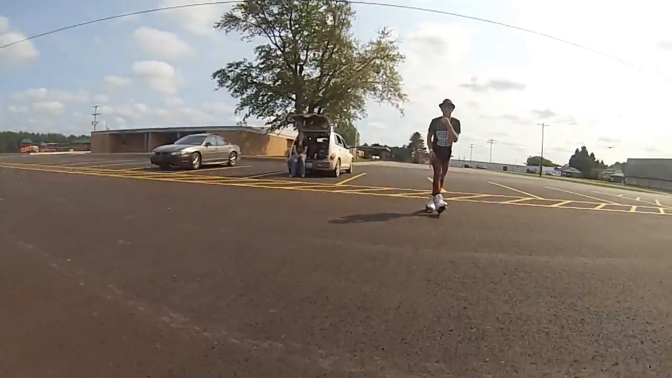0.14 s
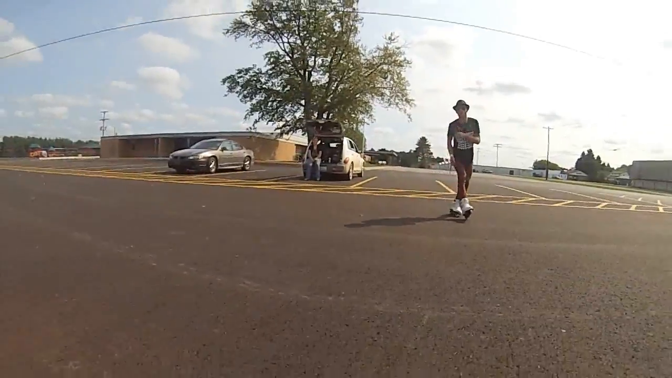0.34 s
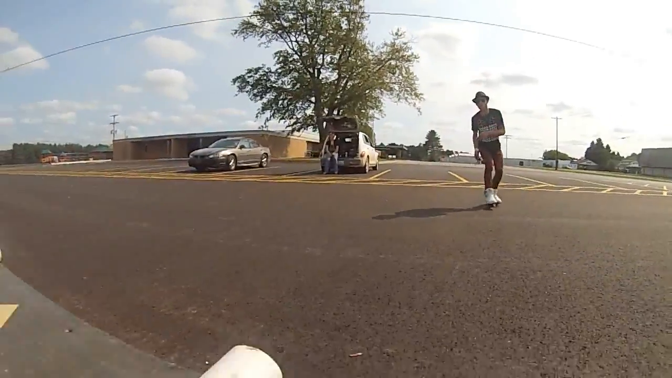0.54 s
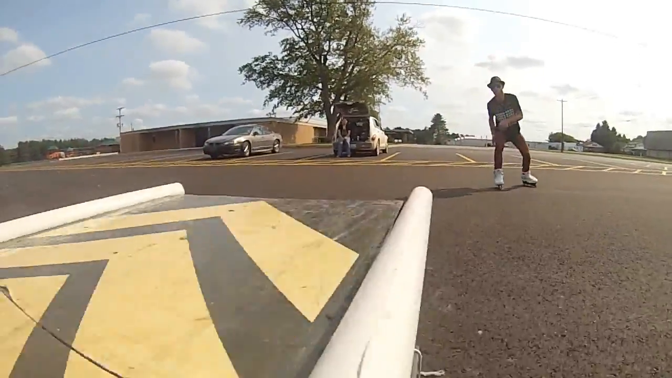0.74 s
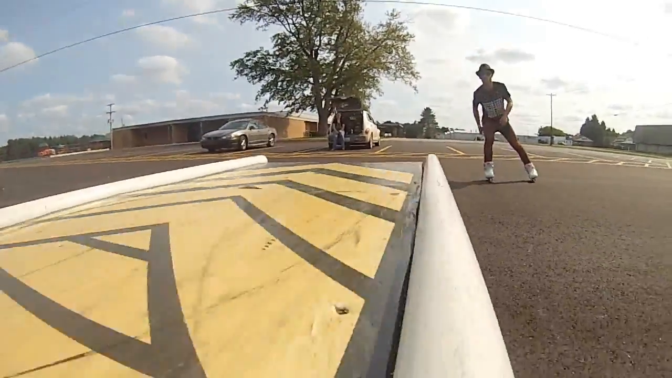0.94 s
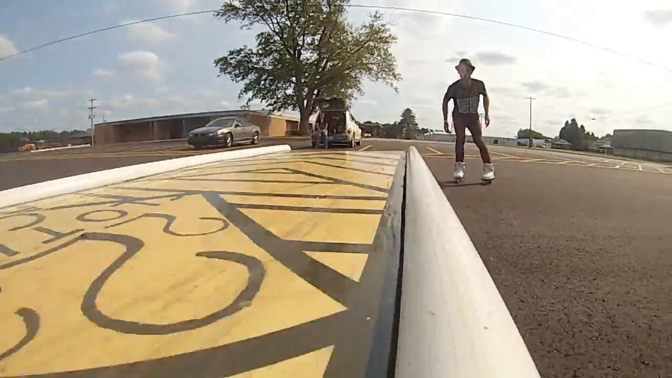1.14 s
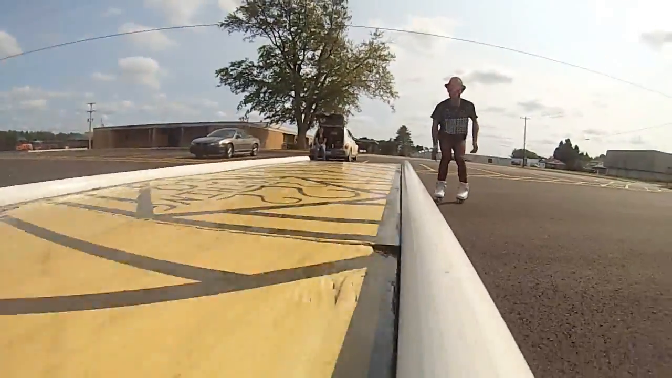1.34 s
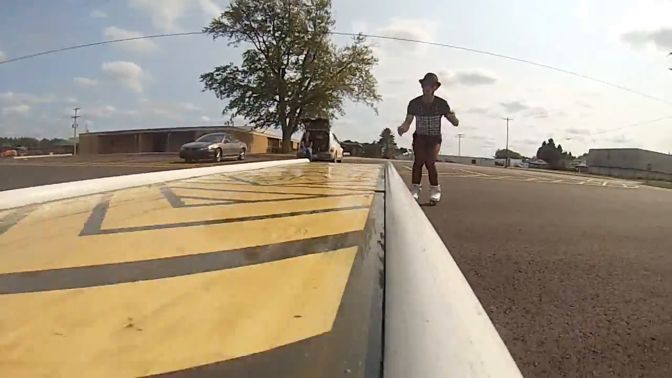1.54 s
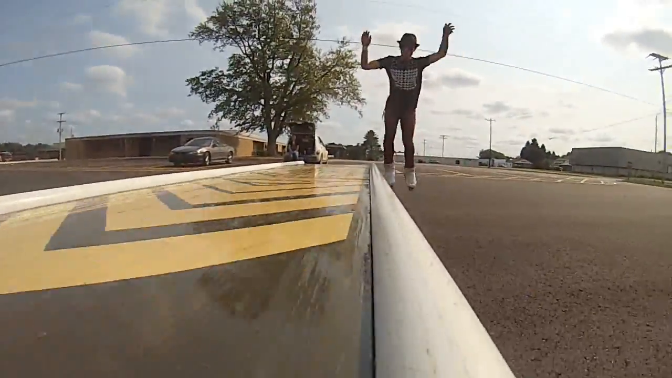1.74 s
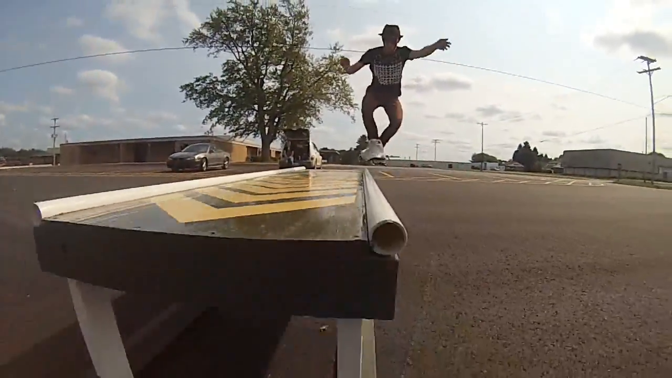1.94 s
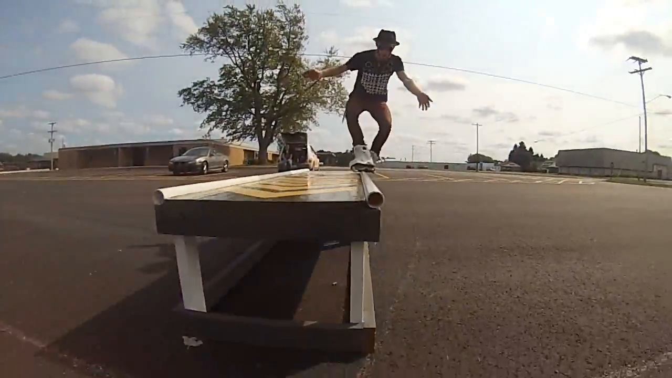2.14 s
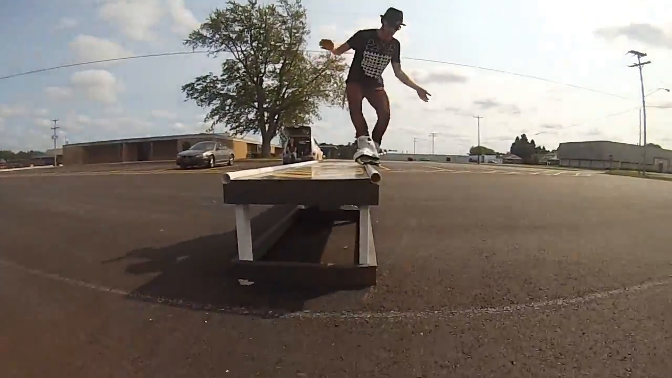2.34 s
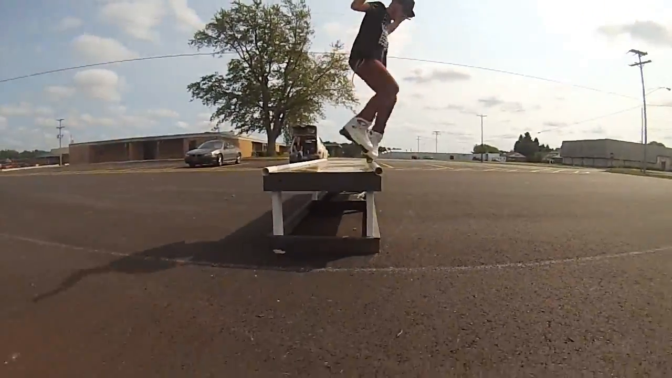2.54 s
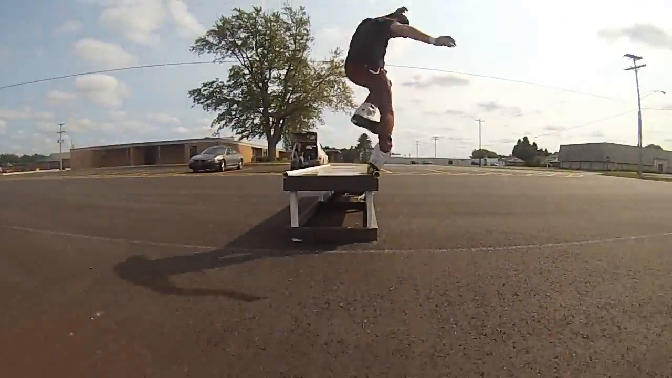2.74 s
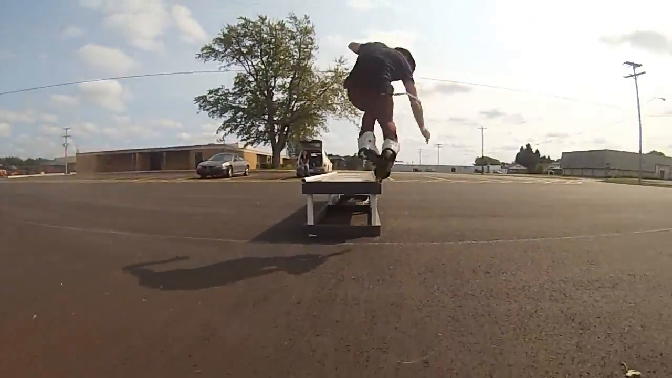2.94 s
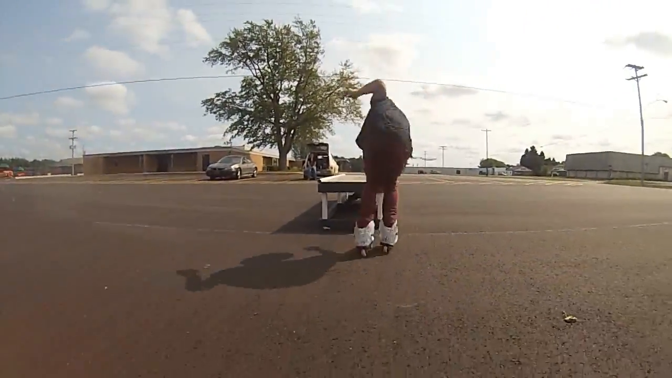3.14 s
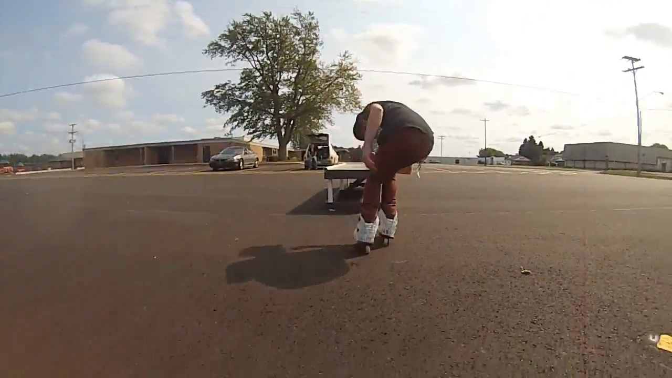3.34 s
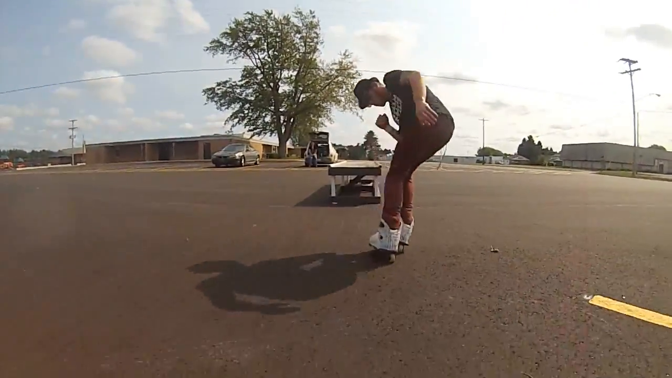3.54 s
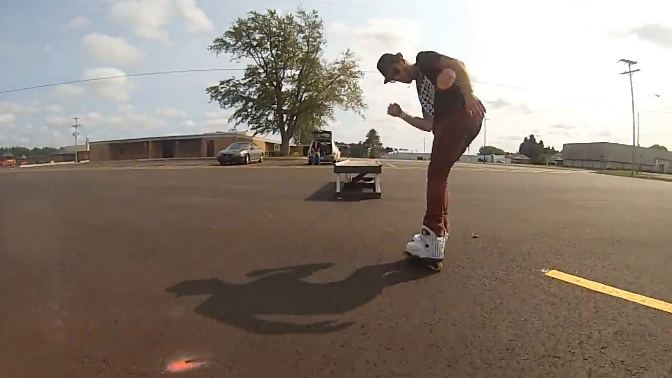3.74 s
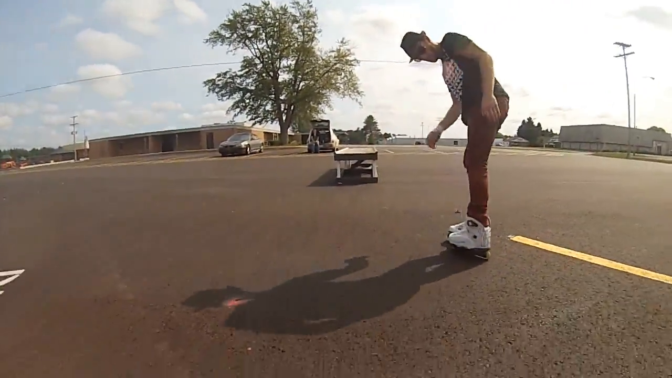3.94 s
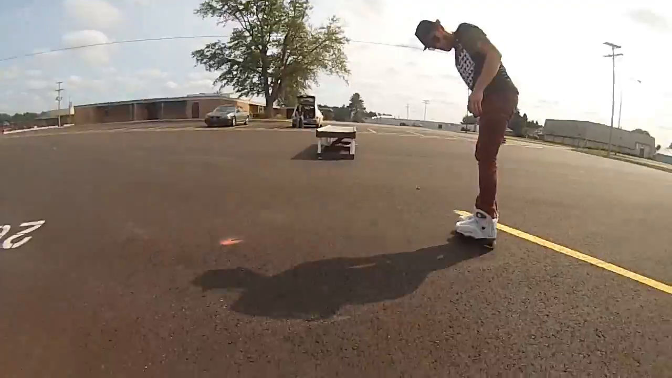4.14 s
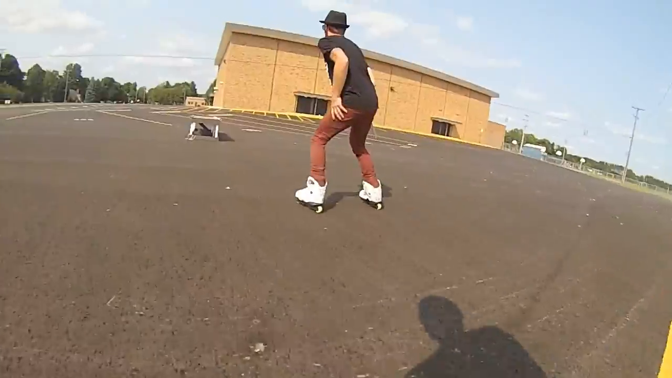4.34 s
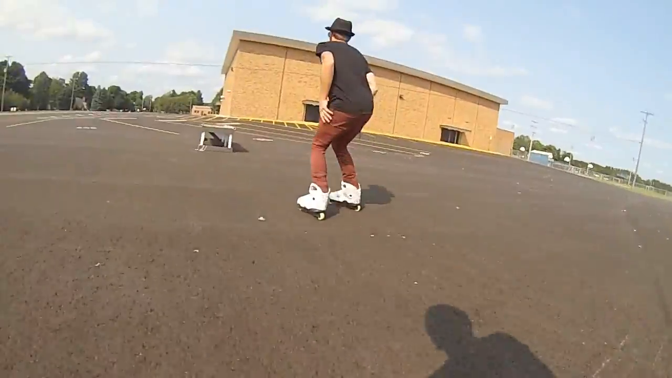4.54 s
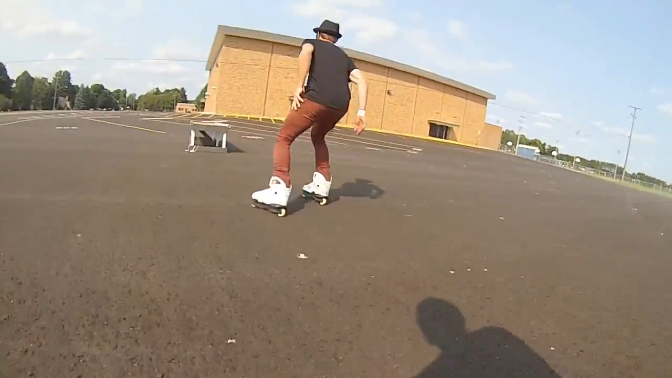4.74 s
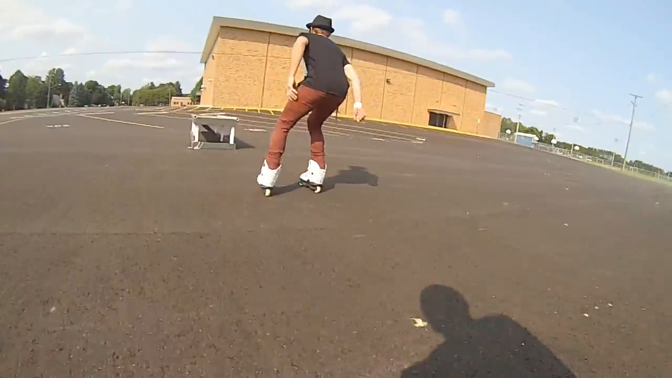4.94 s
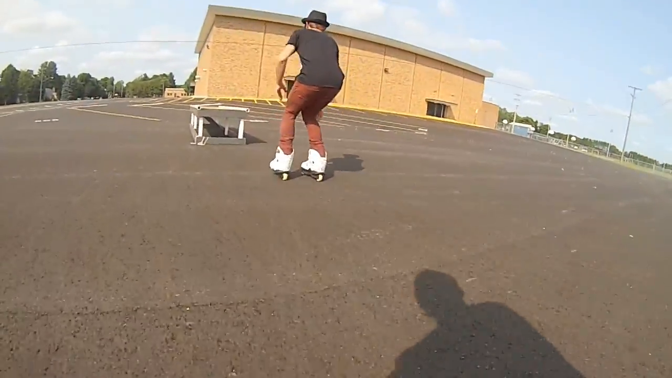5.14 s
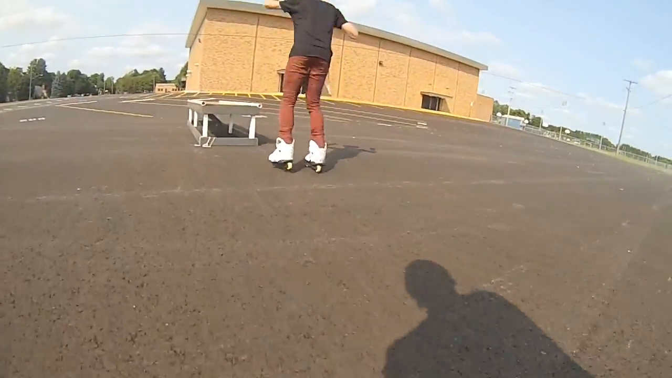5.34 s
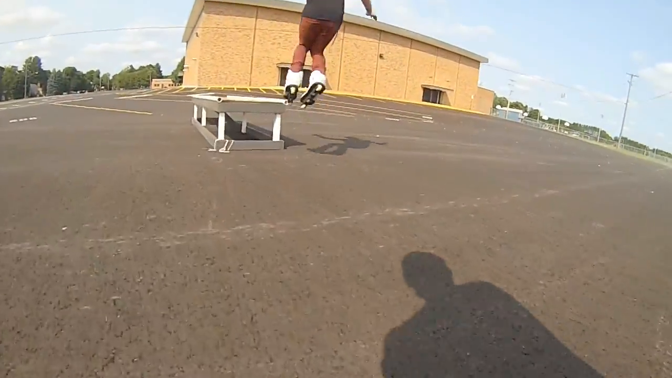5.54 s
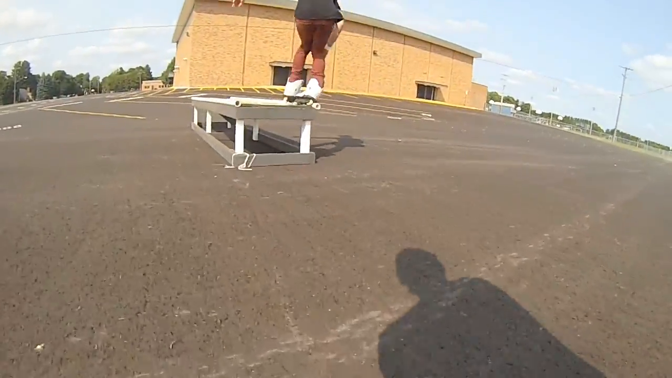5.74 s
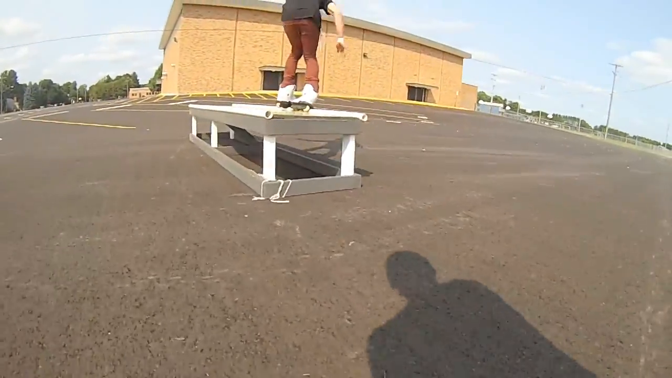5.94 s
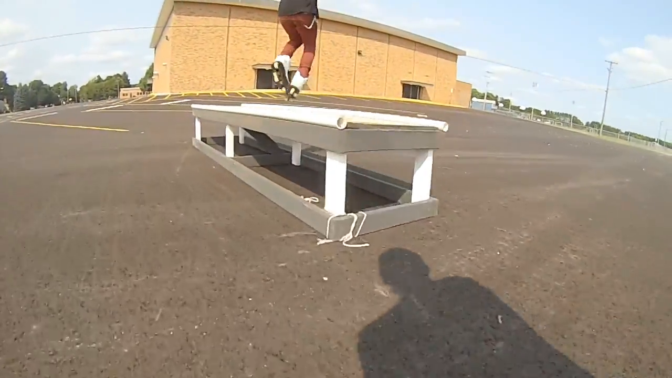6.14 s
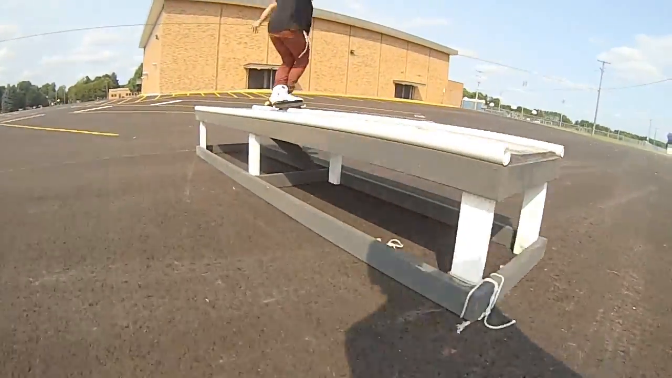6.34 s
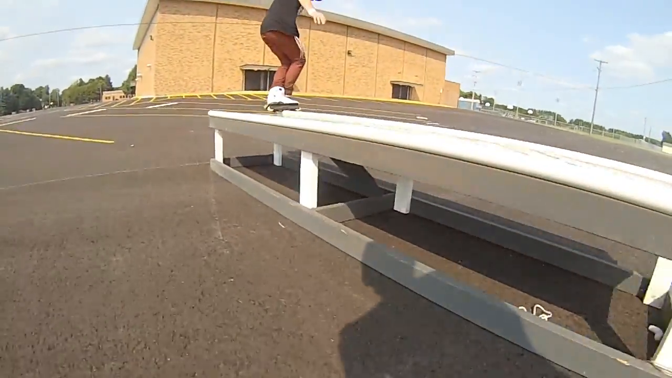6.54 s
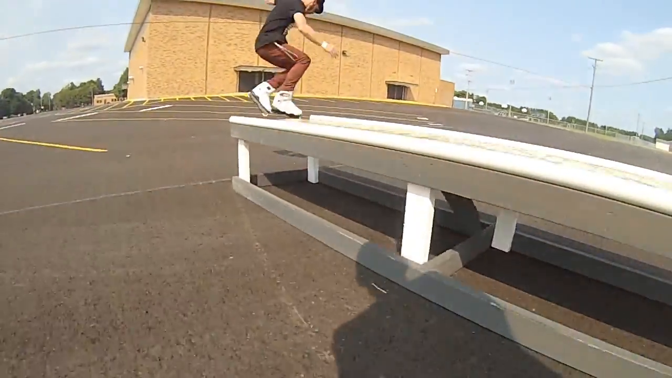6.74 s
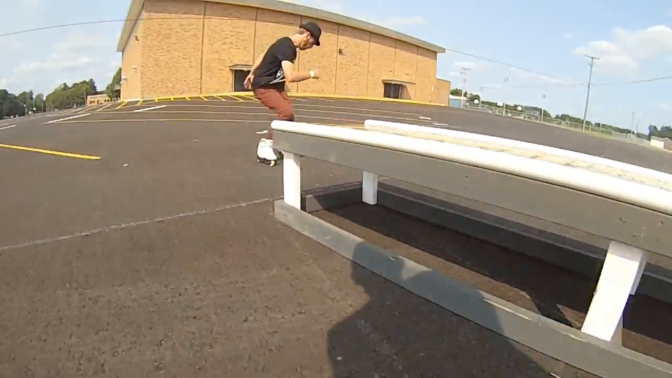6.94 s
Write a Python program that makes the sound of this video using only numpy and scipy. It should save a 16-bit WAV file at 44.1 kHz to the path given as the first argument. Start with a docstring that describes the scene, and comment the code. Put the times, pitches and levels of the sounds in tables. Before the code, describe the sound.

In an open parking lot, a microphone moving with an inline skater picks up a soft, low wheel rumble with dry rasp, faint hiss and small regular ticks, plus light wind. At about 2.05 s a tight cluster of hard plastic cracks and deep hollow wood knocks lands on a box, which rings briefly. Quieter sliding follows, then two sharper knocks near 2.75 s and a quick clatter of wheels slapping asphalt at 3.15 s. Rolling continues quietly until a small slap at 4.35 s and a rougher, brighter sideways scrub to 4.7 s. The wheels then roll louder, bumping over grit. Box knocks come at 5.75 s amid a low wind gust, bright ticks around 6.0 to 6.2 s, heavier clacks at 6.3 to 6.4 s and a softer one at 6.57 s. A dry double slap on asphalt ends it near 6.97 s. Hardly any reverberation.

```python
"""Inline skates on the asphalt of an open parking lot, heard from a point that rolls along with the skater.
Random stone kicks and noise, filtered in three bands, make the wheels rumble, rasp and hiss.
Twice the skater jumps on a wooden box, slides along it and drops off: noise cracks, damped knocks, ringing modes.
Between the passes the wheels scrub sideways; short rings with a bright snap tick in step or singly.
Wind buffets as low noise, and a limiter ducks the whole sound after each hard blow."""
import sys
import numpy as np
from scipy import signal
from scipy.fft import rfft, irfft
from scipy.io import wavfile
from scipy.ndimage import uniform_filter1d

SR = 44100
rng = np.random.default_rng(int(sys.argv[2]) if len(sys.argv) > 2 else 0)


def bounce(signal):
    """Save signal as a 16-bit WAV file at the path given by the first command-line argument."""
    frames = np.transpose(np.atleast_2d(signal))
    limited = np.clip(frames, -1, 1)
    pcm = np.round(limited * 32767).astype(np.int16)
    wavfile.write(sys.argv[1], SR, pcm)


N = 308700  # samples, 7 s


def gain_of(db):
    """Decibel law: 20 dB is a factor of ten in amplitude."""
    return 10 ** (np.asarray(db) / 20)


def evened(x):
    """Power normalization: scales to an rms of 1."""
    return x / np.sqrt(np.mean(x ** 2) + 1e-20)


def add(mix, s, sound):
    """Superposition: adds a sound to the mix from time s in seconds."""
    part = mix[round(s * SR):][:len(sound)]
    part += sound[:len(part)]


def colour(x, points, size=4096):
    """Minimum-phase filtering: a causal response of the given spectrum; white noise keeps its power."""
    point_hz, point_db = np.transpose(points)
    hz = abs(np.fft.fftfreq(size, 1 / SR)) + 1
    log_gain = np.log(gain_of(np.interp(np.log(hz), np.log(point_hz), point_db)))
    # the Hilbert transform of the log gain gives the phase
    spectrum = np.exp(np.conj(signal.hilbert(log_gain)))
    taps = np.fft.ifft(spectrum).real[:size // 2]
    return signal.oaconvolve(x, taps / np.linalg.norm(taps))[:len(x)]


def band(x, low_hz, high_hz):
    """Band-pass filtering: keeps one band, with steep skirts."""
    hz = np.fft.rfftfreq(len(x), 1 / SR) + 1
    skirts = np.sqrt((1 + (low_hz / hz) ** 20) * (1 + (hz / high_hz) ** 20))
    return irfft(rfft(x) / skirts, len(x))


def wander(rate_hz):
    """Low-pass random modulation: slow fluctuation of rms 1."""
    hz = np.fft.rfftfreq(N, 1 / SR)
    return evened(irfft(rfft(rng.standard_normal(N)) / (1 + (hz / rate_hz) ** 4), N))


def ring(modes, t):
    """Modal superposition: a struck body sounds as a sum of exponentially dying sines."""
    return sum(gain_of(db - 60 * t / t60) * np.sin(2 * np.pi * hz * t) for hz, db, t60 in modes)


def nearest(modes, pitch_hz, focus_hz, detune):
    """Modal excitation: where a body is struck decides which modes ring most; each blow detunes them."""
    chosen = []
    for hz, db, t60 in modes:
        loss_db = 10 * np.log10(1 + ((hz - pitch_hz) / focus_hz) ** 2)
        chosen.append((hz * (1 + detune * rng.uniform(-0.97, 1)), db - loss_db, t60))
    return chosen


def push(t, hz, swell_s):
    """Damped oscillation: a swing whose envelope swells to 1 at swell_s and then dies."""
    return t / swell_s * np.exp(1 - t / swell_s) * np.sin(2 * np.pi * hz * t)


def stones(per_s, spread_db):
    """Random impact train: wheels meet stones as many small kicks and a few large ones."""
    size = gain_of(spread_db * np.minimum(rng.exponential(1, N), 4))
    struck = rng.random(N) < per_s / SR
    return evened(size * rng.choice([-1, 1], N) * struck)


def scatter(x, spread_s):
    """Multipath dispersion: short paths through wheel, frame and boot smear each kick over milliseconds."""
    t = np.arange(1024) / SR
    paths = rfft(rng.standard_normal(len(t)) * (t / spread_s) * np.exp(-t / spread_s))
    flat_paths = irfft(paths / (abs(paths) + 1e-12))[:700]  # keeps the phases, levels the spectrum
    return signal.oaconvolve(x, flat_paths)[:len(x)]


# How hard the wheels roll; rumble, rasp and hiss all follow it.
# Each row: time in seconds, level in dB.
ROLLING_LEVEL = [(0.08, -32), (0.33, -35), (0.87, -32), (1.35, -32), (1.58, -35), (1.71, -31.5),
                 (1.87, -36), (2.66, -30), (3.45, -34), (3.7, -33), (4.28, -34.5), (4.39, -28.5),
                 (5.03, -26), (5.22, -27), (5.87, -25), (6.24, -26), (6.78, -29), (6.9, -27)]


def roll_db(s):
    """Linear interpolation: level of the rolling in dB at a time in seconds."""
    return np.interp(s, *np.transpose(ROLLING_LEVEL))


# Rolling spectra of the first pass, the sideways scrub and the second pass.
# Each row: frequency in Hz, relative spectral level in dB per Hz.
FIRST_PASS_SPECTRUM = [(45, -14), (130, 1), (200, -2.5), (320, -6.5), (460, -3), (690, -5.5), (1050, -19.5),
                       (1550, -18.5), (2100, -18.5), (3200, -24.5), (3800, -32.5), (4900, -32.5),
                       (7500, -41), (14000, -47)]
SCRUB_SPECTRUM = [(50, -30), (150, 3), (370, -3.5), (520, -2.5), (720, 3), (1000, -19.5), (1850, -25.5),
                  (2450, -25), (3400, -26), (4300, -30), (5600, -29.5), (7000, -34), (9300, -36.5),
                  (11000, -45), (14000, -42)]
SECOND_PASS_SPECTRUM = [(50, -16), (170, 2.5), (290, -2.5), (380, -6), (670, -4), (1000, -18), (1300, -14),
                        (1560, -9.5), (1780, -20), (2100, -13), (3400, -21), (4000, -40.5), (9500, -52),
                        (10800, -59), (14000, -58)]


def rolling(spectrum, start, end, rasp_db, hiss_db, grainy, gritty, patchy_db, chatter_db=-1.0):
    """Roughness excitation: stone kicks and smooth tread noise shake wheel and boot, more on rough patches."""
    t = np.arange(N) / SR
    kicks = stones(per_s=1100, spread_db=2)
    tread = rng.standard_normal(N)
    grit = gritty * scatter(stones(per_s=200, spread_db=0.0), spread_s=0.0018)  # reaches only rasp and hiss
    ground_db = patchy_db * wander(rate_hz=22)
    wheel_db = gritty * chatter_db * np.clip(wander(rate_hz=96), -2, 1.6)  # wheels chatter in their frames
    rumble = evened(band(colour(grainy * kicks + tread, spectrum), 30, 1050))
    rasp = evened(band(colour((grit + tread) * gain_of(wheel_db), spectrum), 1050, 3900))
    hiss = evened(band(colour(.5 * grit + tread, spectrum), 3900, 16000))
    wheels = gain_of(ground_db) * rumble
    wheels += gain_of(rasp_db + .5 * ground_db) * rasp
    wheels += gain_of(hiss_db) * hiss
    stretch = uniform_filter1d(1. * (t >= start) * (t < end), size=600)
    return gain_of(roll_db(t)) * wheels * np.sqrt(abs(stretch))  # equal-power crossfade at the ends


# Swells of hiss in one band, some from sliding.
# Each row: centre in seconds, half length in seconds, level in dB, centre frequency in Hz, width in Hz.
HISS_SWELLS = [(0.05, 0.91, -60, 3300, 400), (0.85, 0.14, -53.5, 4500, 1400), (1.55, 0.3, -68, 13600, 1840),
               (1.6, 0.35, -58.5, 5670, 3440), (2.303, 0.43, -63.5, 8500, 3000),
               (3.545, 0.88, -60, 4800, 2600), (4.038, 0.069, -52, 2790, 692), (4.61, 0.1, -48, 5350, 900),
               (4.58, 0.014, -51, 8900, 3500), (4.88, 0.72, -54, 3230, 400), (6.9, 0.15, -62, 4600, 1300)]


def hiss_swells():
    """Band-limited noise: swells of hiss in one band, some from sliding, under a bell-shaped envelope."""
    out, t = np.zeros(N), np.arange(N) / SR
    hz = np.fft.rfftfreq(N, 1 / SR)
    for s, half_s, db, centre_hz, width_hz in HISS_SWELLS:
        response = 1 / (1 + ((hz - centre_hz) / width_hz) ** 2) ** 3.3
        hiss = irfft(rfft(rng.standard_normal(N)) * response, N)
        out += gain_of(db) * np.exp(-.5 * ((t - s) / half_s) ** 2) * evened(hiss)
    return out


# Spectrum of the boot's crack. Each row: frequency in Hz, relative spectral level in dB per Hz.
CRACK_SPECTRUM = [(200, -6.5), (600, 10), (1100, 3.5), (1750, -2.5), (2300, 0), (2650, -7), (3250, -2),
                  (4000, -9.5), (5600, -14), (7000, -17.5), (9500, -25), (14000, -28.5)]
# Modes of the skate frame. Each row: frequency in Hz, relative level in dB, 60 dB decay time in seconds.
FRAME_MODES = [(1194, 9.5, 0.0088), (2180, 0, 0.018), (2680, -1.5, 0.031), (2950, 5.5, 0.019),
               (3607, 3, 0.017), (4940, 3, 0.022), (5580, -6, 0.013)]


def crack(t, decay_ms, dull_hz, ring_hz, rattle_db=-21, rattle_s=0.022, rise_s=0.0013):
    """Impact: hard plastic cracks, the frame rings, then wheels and buckles rattle briefly."""
    fade = np.exp(-1000 * t / decay_ms)
    rattle = gain_of(rattle_db) * np.exp(-t / rattle_s)
    burst = colour((fade + rattle) * rng.standard_normal(len(t)), CRACK_SPECTRUM)
    # softer contacts lose treble
    burst = signal.lfilter(*signal.butter(1, min(dull_hz, .45 * SR), fs=SR), burst)
    frame = ring(nearest(FRAME_MODES, ring_hz, focus_hz=220, detune=0.057), t)
    return (1.63 * burst + frame) * (1 - np.exp(-t / rise_s))


def thump(t, thump_hz=158, thump_s=0.0047, shell_hz=262, shell_db=-2.5, shell_s=0.0039):
    """Momentum transfer: body weight and boot shell give two low damped swings."""
    return push(t, thump_hz, thump_s) + gain_of(shell_db) * push(t, shell_hz, shell_s)


DECK_SWELL_S, SOLE_HZ = 0.0026, 460  # swell time of a knock on the deck; pitch of the settling sole
REBOUND_S, REBOUND_DB = 0.0089, -13  # basic spacing of the sole's rebounds; step in level from each to the next
# Modes of the box's plywood deck and frame.
# Each row: frequency in Hz, relative level in dB, 60 dB decay time in seconds.
BOX_MODES = [(110, -7, 0.48), (148, -27, 0.09), (192.6, 3, 0.3), (221.6, 5.5, 0.29), (259, -16, 0.17),
             (302, 4.5, 0.18), (400, 1, 0.1), (439, 15, 0.13), (466, 6.5, 0.13), (542, 8.5, 0.2),
             (570.6, 19.5, 0.072), (609, 13, 0.14), (666, -10, 0.17), (795, -1, 0.21), (865, 5.5, 0.13),
             (930, 2, 0.11), (1083, -9, 0.17), (1204, -27, 0.081)]
# A skate meets the box: its shell cracks, its edge knocks on the deck, then the sole settles.
# Each row: start in seconds, crack level in dB, crack decay in ms, dull-above frequency in Hz, frame ring
# in Hz, knock lag in ms, knock level in dB, knock pitch in Hz, settling lag in ms, settling level in dB,
# thump level in dB, relative box ring level in dB.
BOX_CONTACTS = [(2.0512, -24, 6, 2000, 1200, 0.17, -6.5, 610, 2.3, -18, -22, -27),
                (2.055, -18.5, 19, 4500, 2200, 1.2, 0.5, 782, 7, 3.5, -5, -25),
                (2.072, -10.5, 9.4, 4000, 1250, 0.49, 1, 840, 8, 1, -4.5, -15.5),
                (2.079, -7, 5.5, 8000, 1700, 1.34, 3, 700, 8.5, 11, -2.5, -5.5),
                (2.7465, -13, 2.05, 18000, 5700, 7, -1.5, 508, 10.7, -12, -27, -2.5),
                (2.7738, -16, 7.6, 18000, 3400, 9, 5.5, 544, 30.4, 3.5, -21, -7),
                (5.729, -19, 5.2, 11000, 5700, 7.9, -12.5, 481, 14.3, -28, -17.5, -19.5),
                (5.760, -11, 4.2, 7000, 2640, 5.5, -3.5, 650, 14.1, -11, -39, -15),
                (6.3006, -17.5, 12, 2200, 1310, 0.25, 4.5, 670, 9.7, -13, -2.5, -5.5),
                (6.316, -22.5, 19, 2500, 1460, 0.41, -6, 705, 6.6, -4, -5.5, -8.5),
                (6.354, -8.5, 7.6, 4200, 2700, 0.26, -1.5, 710, 9.52, -1, 0, -10),
                (6.388, -28, 20, 4000, 1300, 1.07, -10, 533, 12, -12, -8, -11.5),
                (6.5655, -14.5, 7, 1260, 1390, 0.42, -5, 543, 21.4, -12.5, -32, -24)]


def box_hits(box_db=-11, settle_thump_db=-2, count=3):
    """Plate resonance: after crack, knock and thump the sole settles and chatters while the box rings on."""
    out, t = np.zeros(N), np.arange(16384) / SR
    box = gain_of(box_db) * ring(BOX_MODES, t) * (1 - np.exp(-t / 0.002))
    for (s, crack_db, decay_ms, dull_hz, ring_hz, knock_ms, knock_db, knock_hz,
         settle_ms, settle_db, thump_db, ring_db) in BOX_CONTACTS:
        knock_at, settle_at = s + knock_ms / 1000, s + settle_ms / 1000
        add(out, s, gain_of(crack_db) * crack(t, decay_ms, dull_hz, ring_hz))
        knock = gain_of(knock_db) * push(t, knock_hz, DECK_SWELL_S)
        add(out, knock_at, knock + gain_of(thump_db) * thump(t) + gain_of(ring_db) * box)
        settle = gain_of(settle_db) * push(t, SOLE_HZ, DECK_SWELL_S)
        add(out, settle_at, settle + gain_of(thump_db + settle_thump_db) * thump(t))
        for k in range(1, count + 1):
            rebound = push(t, SOLE_HZ * rng.uniform(1, 1.4), DECK_SWELL_S)
            rebound_at = settle_at + REBOUND_S * (k + rng.uniform(-0.04, 0.16))
            add(out, rebound_at, gain_of(settle_db + k * REBOUND_DB) * rebound)
    return out


# Wheels slapping down on asphalt.
# Each row: start in seconds, crack level in dB, crack decay in ms, dull-above frequency in Hz,
# frame ring in Hz, knock level in dB, knock pitch in Hz, thump level in dB.
ASPHALT_SLAPS = [(3.1549, -6.5, 1.3, 12500, 3600, 2.5, 567, -6.5),
                 (3.1649, -10.5, 5.6, 13000, 3480, -1.5, 770, -11),
                 (3.174, -19, 3.8, 9000, 2180, 2.5, 454, -11),
                 (3.180, -8.5, 3.2, 10770, 5560, 0.5, 600, -13.5),
                 (4.350, -15, 3.1, 3400, 1140, -6, 577, -21), (6.9624, -28, 4, 9000, 1250, -7.5, 254, -33),
                 (6.9673, -11, 2.8, 17000, 2930, -2.5, 608, -12),
                 (6.9742, -9.5, 3.2, 12000, 3170, -3.5, 830, -30)]
# Wheels knocking over bumps in the asphalt. Each row: start in seconds, level in dB.
ASPHALT_BUMPS = [(0.487, -23.5), (0.885, -22), (4.648, -17.5), (4.887, -19), (5.021, -18), (5.464, -20),
                 (6.715, -15.5), (6.882, -16)]


def asphalt_hits(slap_swell_s=0.00088, bump_hz=640, bump_swell_s=0.0011, bump_thump_db=-9):
    """Impact on a stiff ground: slaps crack, knock and thump at once; bumps knock with a weaker thump."""
    out, t = np.zeros(N), np.arange(8192) / SR
    for s, crack_db, decay_ms, dull_hz, ring_hz, knock_db, knock_hz, thump_db in ASPHALT_SLAPS:
        knock = gain_of(knock_db) * push(t, knock_hz, slap_swell_s)  # short and dry
        blow = gain_of(crack_db) * crack(t, decay_ms, dull_hz, ring_hz)
        add(out, s, blow + knock + gain_of(thump_db) * thump(t))
    for s, db in ASPHALT_BUMPS:
        bump = push(t, bump_hz, bump_swell_s) + gain_of(bump_thump_db) * thump(t)
        add(out, s, gain_of(db) * bump)
    return out


# Modes of wheel and frame. Each row: frequency in Hz, relative level in dB, 60 dB decay time in seconds.
WHEEL_MODES = [(2103, 0.5, 0.0073), (2475, -6, 0.0069), (3230, -0.5, 0.0068)]
# Spectrum of a tick's bright snap. Each row: frequency in Hz, relative spectral level in dB per Hz.
SNAP_SPECTRUM = [(1000, -41), (2500, -36), (4500, 19.5), (7000, 7), (10000, 8.5), (14000, -31)]


def tick(pitch_hz, snap_db, ring_db=10, snap_s=0.0006, bump_db=-3, bump_hz=170):
    """Modal excitation: wheel modes near the pitch ring, with a bright snap and a small bump of the boot."""
    t = np.arange(2048) / SR
    modes = nearest(WHEEL_MODES, pitch_hz, focus_hz=855, detune=0.061)
    wheel = gain_of(ring_db) * ring(modes, t) * (1 - np.exp(-t / 0.00074))
    boot = ring([(bump_hz, bump_db, .025)], t)
    snap_envelope = t / snap_s * np.exp(1 - t / snap_s)
    snap = colour(rng.standard_normal(len(t)) * snap_envelope, SNAP_SPECTRUM)
    return wheel + boot + gain_of(snap_db) * snap


FINE_GRIT_PER_S, FINE_GRIT_DB = 6, -6  # small grit comes by chance; mean tick gain over the rolling level
# Spells in which one wheel ticks once every turn.
# Each row: first tick in seconds, end in seconds, time of a turn in seconds, mean tick gain in dB.
TICKING_SPELLS = [(0.12, 0.28, 0.069, -36.5), (0.6958, 1.07, 0.0698, -33), (1.3122, 1.55, 0.0708, -26.5),
                  (1.8045, 2.19, 0.0712, -31), (3.238, 3.78, 0.078, -40.5), (6.749, 6.93, 0.077, -25.5)]
# Single louder ticks, from a turning wheel or from grit.
# Each row: start in seconds, tick gain in dB, frequency in Hz near which the modes are favoured.
SINGLE_TICKS = [(0.0395, -20.5, 3440), (1.1326, -30, 3190), (1.431, -31.5, 3100), (1.1846, -29.5, 2050),
                (1.242, -31.5, 1900), (2.592, -31.5, 2370), (2.649, -33, 2106), (3.0727, -29.5, 2400),
                (3.532, -30.5, 2180), (3.7594, -33, 2150), (5.0816, -29.5, 3350), (5.176, -32, 3340),
                (5.366, -26.5, 2080), (5.5474, -25, 1980), (5.5736, -28, 2500), (5.8162, -25, 1980),
                (6.0066, -18.5, 1900), (6.133, -21, 2200), (6.1657, -19, 1920), (6.2018, -15.5, 1940),
                (6.6505, -27, 2000), (6.6895, -23.5, 2580)]


def ticks(uneven_db=2):
    """Periodic and random impacts: dull ticks once a turn, brighter single ticks, and fine grit by chance."""
    out = np.zeros(N)
    for s, db, pitch_hz in SINGLE_TICKS:
        add(out, s, gain_of(db) * tick(pitch_hz, snap_db=-14))
    for start, end, turn_s, db in TICKING_SPELLS:
        for s in np.arange(start, end, turn_s):
            tick_db = db + uneven_db * rng.standard_normal()
            add(out, s, gain_of(tick_db) * tick(pitch_hz=1990, snap_db=-18.5))
    for s in rng.uniform(0, N / SR, round(FINE_GRIT_PER_S * N / SR)):
        grit_db = roll_db(s) + FINE_GRIT_DB + uneven_db * rng.standard_normal()
        add(out, s, gain_of(grit_db) * tick(pitch_hz=rng.uniform(2000, 3500), snap_db=-17))
    return out


def lot(x, wet_db=-19, t60=0.24):
    """Diffuse scattering in open air: ground and box return only a faint, short tail."""
    t = np.arange(SR // 2) / SR
    tail = rng.standard_normal(len(t)) * gain_of(-60 * t / t60) * (t > .004)
    return x + gain_of(wet_db) * signal.oaconvolve(x, tail / np.linalg.norm(tail))[:N]


BREEZE_DB = -56  # steady breeze under the gusts
# Spectrum of the wind. Each row: frequency in Hz, relative spectral level in dB per Hz.
WIND_SPECTRUM = [(10, -31), (30, 0.5), (60, -4.5), (90, -2.5), (200, -5.5), (600, -67)]
# Gusts on the microphone. Each row: centre in seconds, half length in seconds, level in dB.
WIND_GUSTS = [(0.1, 0.23, -45), (1.22, 0.059, -41), (1.51, 0.081, -39), (4.81, 0.25, -47),
              (5.81, 0.13, -25), (5.5, 1, -37.5)]


def wind(gust_db=2):
    """Turbulent pressure: a microphone in motion is buffeted by lumpy low noise, a breeze plus gusts."""
    t = np.arange(N) / SR
    strength = gain_of(BREEZE_DB)
    for s, half_s, db in WIND_GUSTS:
        strength = strength + gain_of(db) * np.exp(-.5 * ((t - s) / half_s) ** 2)
    lumps = gain_of(gust_db * wander(rate_hz=7.5)) * colour(rng.standard_normal(N), WIND_SPECTRUM)
    return strength * evened(lumps)


def scene():
    """Superposition of sources: two passes at the box with a sideways scrub between them."""
    scrub_start_s, scrub_end_s = 4.29, 4.735
    wheels = rolling(FIRST_PASS_SPECTRUM, 0, scrub_start_s, rasp_db=-16.0, hiss_db=-26.0,
                     grainy=.8, gritty=1.0, patchy_db=1.53)
    wheels += rolling(SCRUB_SPECTRUM, scrub_start_s, scrub_end_s, rasp_db=-10.5, hiss_db=-22,
                      grainy=0.88, gritty=0.9, patchy_db=1.1)
    wheels += rolling(SECOND_PASS_SPECTRUM, scrub_end_s, N / SR, rasp_db=-15.5, hiss_db=-27.0,
                      grainy=0.98, gritty=1.97, patchy_db=1.1, chatter_db=-1.83)
    impacts = lot(box_hits() + asphalt_hits() + ticks())
    return (wheels + hiss_swells() + impacts + wind())[None]


def record(dry, ceiling_db=-1.5, recover_db_per_s=21, edge_hz=14600):
    """Peak limiting: gain drops almost at once on a blow and recovers slowly; a low-pass then limits the band."""
    over_db = np.maximum(20 * np.log10(abs(dry[0]) + 1e-9) - ceiling_db, 0)
    fall = np.arange(N) * recover_db_per_s / SR
    held_db = np.maximum.accumulate(over_db + fall) - fall  # peaks decay at a constant rate
    duck_db = uniform_filter1d(held_db, size=40)
    low_pass = signal.firwin(401, edge_hz, window=("kaiser", 9), fs=SR)[None]
    return signal.oaconvolve(dry / gain_of(duck_db), low_pass, "same")


dry = scene()
out = record(dry)
bounce(out)
```